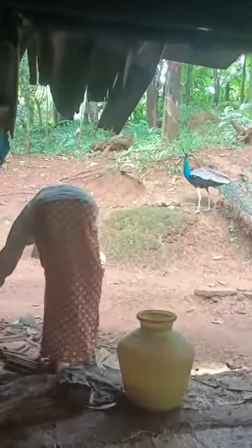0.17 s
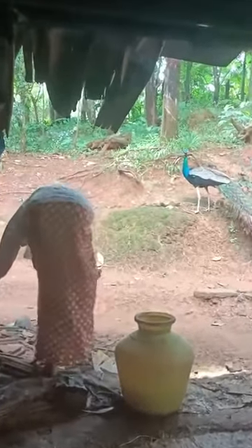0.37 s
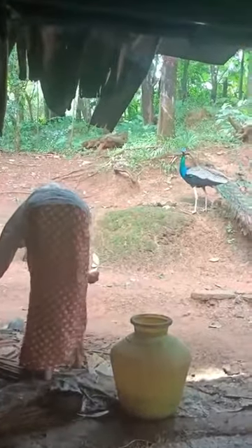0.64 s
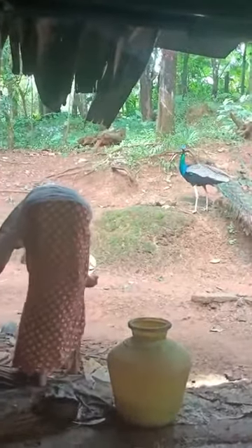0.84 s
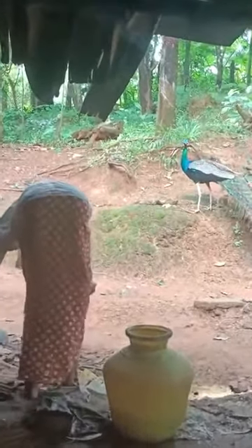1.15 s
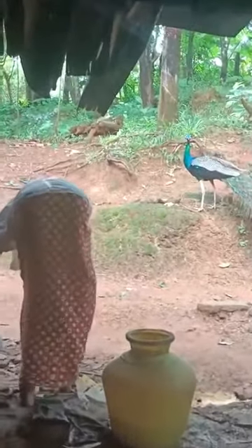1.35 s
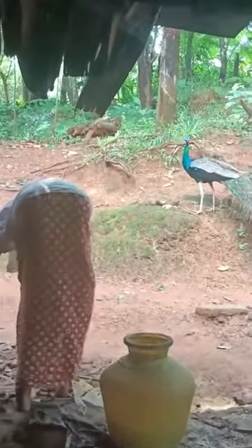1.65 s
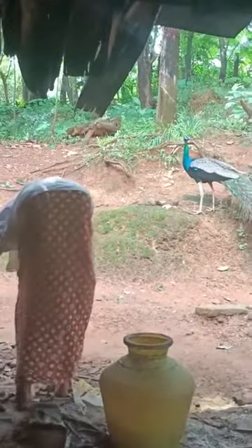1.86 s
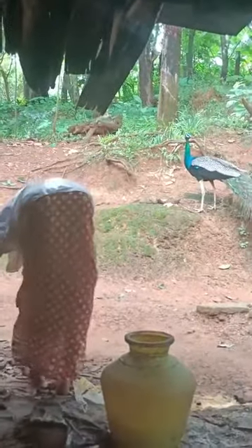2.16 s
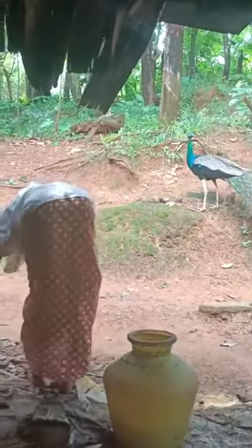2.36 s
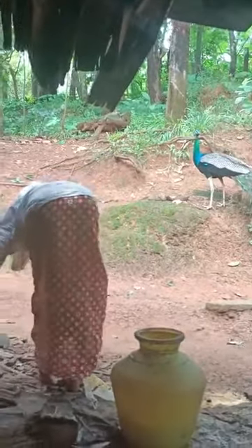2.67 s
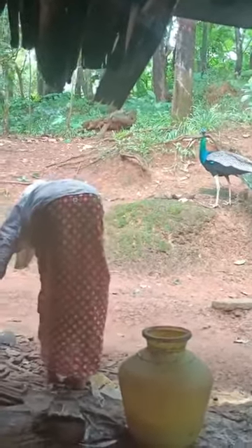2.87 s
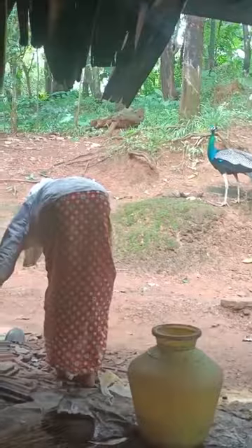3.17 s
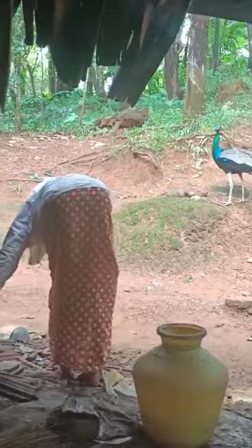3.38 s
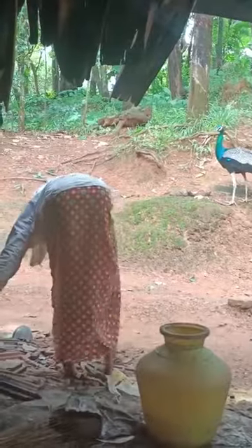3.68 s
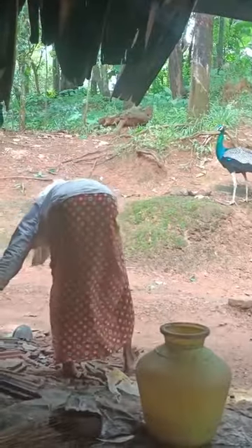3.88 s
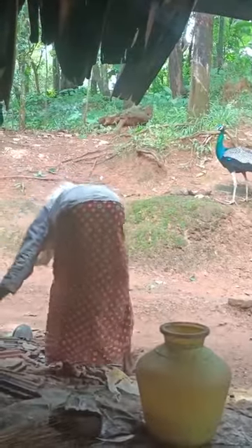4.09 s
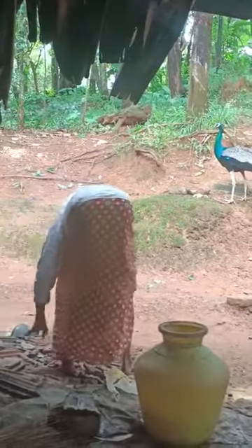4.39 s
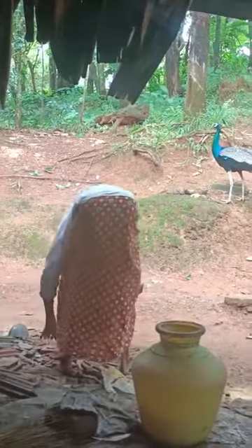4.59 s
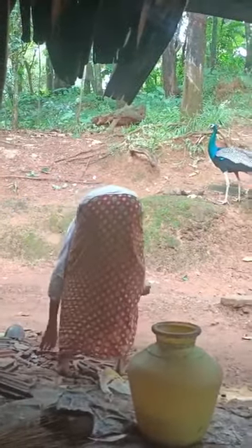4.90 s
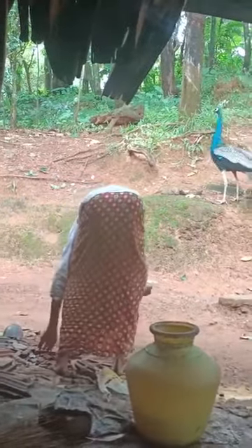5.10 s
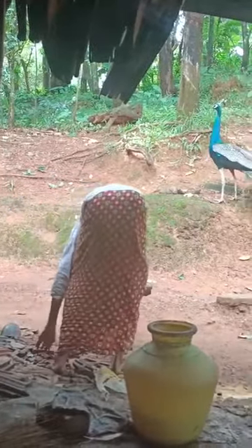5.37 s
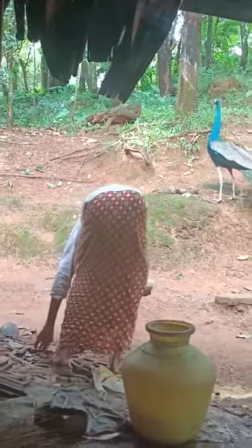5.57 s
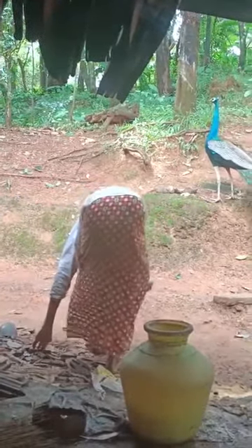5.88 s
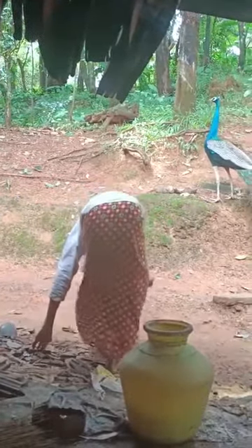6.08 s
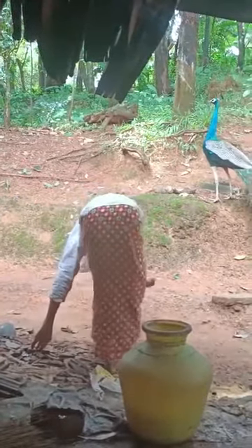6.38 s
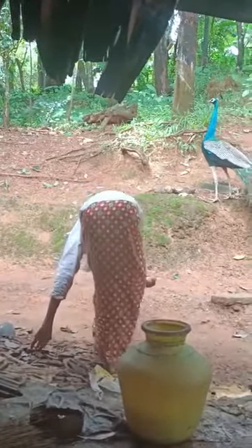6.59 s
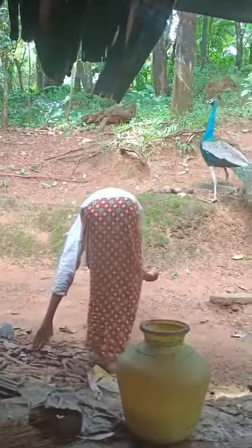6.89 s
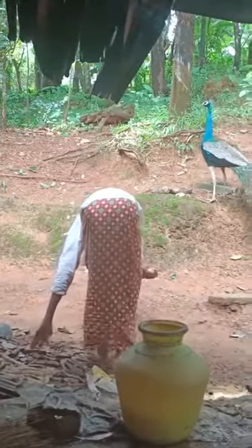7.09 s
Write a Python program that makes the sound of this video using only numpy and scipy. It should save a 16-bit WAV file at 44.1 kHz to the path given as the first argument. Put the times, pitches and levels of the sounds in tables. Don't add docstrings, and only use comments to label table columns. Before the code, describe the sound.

In a lean-to beside a wooded yard, a near chick repeats loud, pure whistled peeps that slip and break downward. Softer chicks slide and wander around it, and a hen clucks low and breathily farther off. Dry leaves rustle midway, snapping sharply at five seconds, then the calls continue. Steady airy hiss throughout; phone-like stereo pickup with short wall echoes.

```python
import sys
import numpy as np
from scipy import signal
from scipy.fft import rfft, irfft
from scipy.io import wavfile
from scipy.ndimage import uniform_filter1d

SR = 44100
rng = np.random.default_rng(int(sys.argv[2]) if len(sys.argv) > 2 else 0)


def generate_wav(sig):
    pcm = np.round(np.clip(np.atleast_2d(sig).T, -1, 1) * 32767).astype(np.int16)
    wavfile.write(sys.argv[1], SR, pcm)


def gain_from_db(level_db):
    decades = np.asarray(level_db, float) / 20
    return 10 ** decades


N = 319725


def evened(x):
    return x / np.sqrt(np.mean(x ** 2) + 1e-20)


def read(points, hz):
    f, value = np.transpose(points)
    return np.interp(np.log(hz + 1), np.log(f + 1), value)


def wander(length, size):
    noise = rng.standard_normal(SR // 4)
    return evened(signal.oaconvolve(noise, np.hanning(2 * size), "same"))[:length]


def unfold(rows):
    s, *columns = np.transpose(rows)
    t = np.arange(s[0], s[-1], 1 / SR)
    return [uniform_filter1d(np.interp(t, s, c), size=221, mode="nearest") for c in columns]


def add(mix, s, sound):
    at = round(s * SR)
    part = mix[..., max(at, 0):][..., :sound.shape[-1] + min(at, 0)]
    part += sound[..., max(-at, 0):][..., :part.shape[-1]]


def resonate(x, hz, width):
    turn = np.exp(2j * np.pi * np.cumsum(hz * np.ones(len(x))) / SR)
    r = np.exp(-np.pi * width / SR)
    smooth = signal.lfilter([1 - r], [1, -r], x / turn + 1e-18)
    return 2 * (turn * smooth).real


# (frequency [Hz], t60 [s])
WALL_RING = [(500, 0.28), (3000, 0.32), (8000, 0.25), (14000, 0.15)]


def walls(x):
    length, gap_s, spacing = SR // 2, .003, 20
    start = np.arange(round(gap_s * SR), length - spacing, spacing)
    places = start + rng.integers(0, spacing, (2, len(start)))
    taps = np.zeros((2, length))
    np.put_along_axis(taps, places, rng.choice([-1., 1.], (2, len(start))), 1)
    hz, t, z = signal.stft(taps, SR, nperseg=256)
    long_tail = gain_from_db(-60 * t / read(WALL_RING, hz)[:, None])
    burst = gain_from_db(9.5 - 60 * t / .11)
    echoes = signal.istft(z * (long_tail + burst), SR, nperseg=256)[1]
    return signal.fftconvolve(x, echoes / np.linalg.norm(echoes[0]), axes=1)[:, :N]


AIR_DB = -45.5
# (frequency [Hz], level [dB per Hz])
AIR_COLOUR = [(12, -33), (20, -5.5), (96, -2), (326, -5.5), (456, -5.5), (571, -7.5), (656, -10),
              (997, -12.5), (1180, -11), (1650, -15), (2000, -9), (5480, -8.5), (9850, -20.5), (13000, -19),
              (15800, -31)]
# (frequency [Hz], side over mid [dB])
AIR_WIDTH = [(60, -54), (110, -18.5), (200, -16), (380, -6.5), (700, -4.5), (1290, 1), (2380, 0.5),
             (4400, 0), (8120, 0), (15000, -1)]
# (frequency [Hz], left over right [dB])
AIR_LEAN = [(60, 1), (110, -1), (200, 1.5), (380, -1.5), (700, -1), (1290, 3.0), (2380, 2.5), (4400, 2.5),
            (8120, -2.5), (15000, 6)]


def air():
    frames, hz = N // 256 + 5, np.fft.rfftfreq(1024, 1 / SR)
    a, b, c, d, patches = rng.standard_normal((frames, len(hz), 5)).T
    patches = uniform_filter1d(patches, size=12, axis=0)
    patches = evened(uniform_filter1d(patches, size=14, axis=1))
    patches_db = 1.26 * patches * np.minimum(hz / 1500, 1)[:, None]
    level = gain_from_db(read(AIR_COLOUR, hz)[:, None] + patches_db)
    mid = level * (a + 1j * b)
    side = level * (c + 1j * d) * gain_from_db(read(AIR_WIDTH, hz))[:, None]
    scale = gain_from_db(AIR_DB) / np.std(signal.istft(mid, nperseg=1024, noverlap=768)[1])
    lean = gain_from_db(read(AIR_LEAN, hz) / 2)[:, None]
    sides = np.array([(mid + side) * lean, (mid - side) / lean])
    return scale * signal.istft(sides, nperseg=1024, noverlap=768)[1][:, :N]


# (time of the peak [s], level [dB], rise [s], t60 [s], tilt [dB per octave])
RUSTLES = [
    (3.231, -44, 0.035, 0.53, 13),
    (3.621, -33.5, 0.097, 0.22, 10.5),
    (3.887, -32, 0.0012, 0.12, 4.5),
    (5, -25, 0.00063, 0.055, 4),
    (5.008, -22, 0.017, 0.087, 12),
]
# (frequency [Hz], level [dB per Hz])
LITTER_COLOUR = [(710, -57), (1200, -12), (1950, 1), (3140, 6), (7760, -13), (8460, -18.5), (11600, -17),
                 (14100, -22), (15800, -36)]


def litter():
    dry, t = np.zeros((2, N)), np.arange(-SR // 8, SR // 4) / SR
    hz = np.fft.rfftfreq(len(t), 1 / SR)
    for s, db, rise, t60, tilt_db in RUSTLES:
        grains = rng.standard_normal((2, len(t))) * gain_from_db(2.0 * rng.exponential(1, len(t)))
        colour = gain_from_db(read(LITTER_COLOUR, hz) + tilt_db * np.log2((hz + 100) / 5000))
        crackle = evened(irfft(rfft(grains) * colour, len(t)))
        push = np.where(t < 0, np.exp(-(2 * t / rise) ** 2), gain_from_db(-60 * t / t60))
        add(dry, s + t[0], gain_from_db(db) * push * crackle)
    return dry + gain_from_db(-4) * walls(dry)


def cluck_shape(start, length, db, mouth_hz, hz):
    share = np.array([0, .36, 1])
    effort_db = db + np.array([-3.5, 0, -13.5])
    pitch_hz = hz * (1 + .062 * (1 - 2 * share))
    return np.transpose([start + length * share, effort_db, np.full(3, mouth_hz), pitch_hz])


# (frequency [Hz], width [Hz], level [dB])
THROAT = [(384, 310, -6.5), (1096, 1050, -13.5)]


def cluck(rows, rough):
    effort_db, mouth_hz, hz = unfold(rows)
    wobble = 0.071 * rough * wander(len(hz), size=150)
    turns = np.cumsum(hz * (1 + wobble)) / SR
    folds = sum(np.cos(2 * np.pi * k * turns) for k in range(1, 9))
    gate = .3 + np.exp(-(turns % 1) / .35)
    puffs = gate * resonate(rng.standard_normal(SR // 4)[:len(hz)], 1170, 3100)
    drive = (1 - rough) * evened(folds) + rough * evened(puffs)
    voice = resonate(resonate(drive, mouth_hz, 280), mouth_hz, 280)
    for f, width, db in THROAT:
        voice = voice - gain_from_db(db) * resonate(resonate(drive, f, width), f, width)
    return gain_from_db(effort_db) * evened(voice) * signal.windows.tukey(len(hz), .3)


# (start [s], length [s], effort [dB], mouth resonance [Hz], pitch [Hz])
HOARSE_CLUCKS = [(.19, 0.07, -41, 804, 404.6), (1.165, 0.071, -42, 790, 381),
                 (1.62, 0.077, -43, 800, 304.4), (1.95, 0.051, -46, 710, 454),
                 (2.06, 0.087, -42.5, 700, 376.5), (3.01, 0.078, -43.5, 785, 281),
                 (3.145, 0.049, -44.5, 580, 340), (3.74, 0.086, -43, 605, 460),
                 (4.43, 0.127, -45, 580, 274), (4.6, 0.072, -49, 618, 321), (6.53, 0.053, -49.5, 940, 261),
                 (6.645, 0.086, -40.5, 1050, 298)]
# (start [s], length [s], effort [dB], mouth resonance [Hz], pitch [Hz])
CLEAR_CLUCKS = [
    (3.47, 0.078, -43.5, 770, 464),
    (4.01, 0.074, -41, 523, 268),
    (5.04, 0.1, -43.5, 910, 255.2),
    (5.555, 0.08, -40, 790, 252),
    (5.945, 0.1, -42, 776, 255),
]


def hen():
    dry = np.zeros(N)
    for clucks, rough in ((HOARSE_CLUCKS, .75), (CLEAR_CLUCKS, .45)):
        for row in clucks:
            add(dry, row[0], cluck(cluck_shape(*row), rough))
    return gain_from_db([[-2.5], [-3]]) * dry + gain_from_db(2.5) * walls(dry[None])


# (frequency [Hz], level [dB])
OVERTONES = [(5400, -23.5), (6000, -18), (6600, -34.5), (7300, -15), (8000, -20.5), (8800, -30),
             (9500, -24.5), (10200, -18), (11200, -17), (12500, -29), (13500, -29), (15000, -24)]
ORDER_DB = {2: 1, 3: -12.5, 4: -13.5}


def peep(rows, press_db, lag):
    hz, level_db, pan_db = unfold(rows)
    tremble = 1 + 0.004 * wander(len(hz), size=150)
    turns = np.cumsum(hz * tremble) / SR - np.outer([0, lag], hz)
    overtones = 0
    for k, db in ORDER_DB.items():
        strength = gain_from_db(db + read(OVERTONES, k * hz)) * (k * hz < SR / 2)
        overtones = overtones + strength * np.sin(2 * np.pi * k * turns)
    hoarse = 1 + .7 * wander(len(hz), size=50)
    purer_db = -.02 * np.maximum(hz - 4500, 0)
    whistle = np.sin(2 * np.pi * turns) + gain_from_db(press_db + purer_db) * hoarse * overtones
    flutter_db = 3 * wander(len(hz), size=120)
    loudness = np.sqrt(2) * gain_from_db(level_db + flutter_db) * signal.windows.tukey(len(hz), .1)
    return whistle * loudness * gain_from_db(np.outer([.5, -.5], pan_db))


def chicks(peeps, presses_db, direct_db, walls_db, lag):
    dry = np.zeros((2, N))
    for rows, press_db in zip(peeps, presses_db):
        add(dry, rows[0][0], peep(rows, press_db, lag))
    return gain_from_db(direct_db) * dry + gain_from_db(walls_db) * walls(dry)


def slide_shape(start, length, first_hz, last_hz, db):
    share = np.array([0, .53, 1])
    hz = first_hz + (last_hz - first_hz) * (share + [0, .03, 0])
    return np.transpose([start + length * share, hz, db + np.array([2.5, 0, -13.5])])


# (time [s], pitch [Hz], level [dB])
LONG_PEEPS = [
    [(.21, 2950, -36.5), (.248, 3800, -41), (.274, 3560, -38), (.316, 3630, -31.5), (.382, 3350, -34.5),
     (.41, 3100, -50)],
    [(1.535, 4200, -43), (1.55, 4220, -40), (1.578, 4130, -37.5), (1.612, 3750, -40)],
    [(4.51, 4450, -42), (4.545, 4390, -39), (4.572, 4260, -49), (4.59, 2830, -37), (4.612, 2720, -54)],
    [(5.508, 4350, -32), (5.527, 4650, -44.5), (5.59, 3474, -36.5), (5.63, 3230, -37), (5.66, 2980, -48)],
    [(6.2, 4220, -39), (6.216, 4700, -47), (6.24, 4790, -38.5), (6.272, 3770, -36), (6.33, 3603, -28.5),
     (6.37, 3560, -26), (6.4, 3200, -40)],
    [(6.53, 5810, -39.5), (6.58, 5740, -36.5), (6.604, 5170, -37), (6.632, 4530, -46), (6.644, 3620, -29),
     (6.69, 2830, -54)],
    [(7.15, 4310, -52), (7.165, 4640, -39), (7.205, 4810, -38), (7.225, 4350, -36), (7.249, 4470, -39)],
]
# (start [s], length [s], first pitch [Hz], last pitch [Hz], level [dB])
CLEAR_SLIDES = [
    (.785, .068, 4400, 4270, -45),
    (.985, .165, 5350, 4150, -48),
    (2.935, .07, 4560, 4420, -47),
    (.665, .045, 11500, 11050, -50),
]
# (start [s], length [s], first pitch [Hz], last pitch [Hz], level [dB])
PRESSED_SLIDES = [
    (.83, .12, 3500, 2780, -34),
    (1.62, .1, 3160, 2790, -31),
    (4.23, .11, 3520, 2850, -42),
]


def brood():
    voices = [(np.array(rows), 1.5) for rows in LONG_PEEPS]
    voices += [(slide_shape(*row), -25) for row in CLEAR_SLIDES]
    voices += [(slide_shape(*row), 9.5) for row in PRESSED_SLIDES]
    pan_db = 2.5
    placed = [np.column_stack([rows, np.full(len(rows), pan_db)]) for rows, _ in voices]
    return chicks(placed, [press_db for _, press_db in voices], direct_db=-8.0, walls_db=0.14, lag=.00008)


def near_shape(slip, shelf, high_hz, low_hz, db, break_s, held_db):
    hook_s, top_s, slip_s, fade_s, end_s = .013, .03, .019, .018, .017
    shelf_db, break_db = -5, -2
    top_hz = 5116 + 28 * (db + held_db + 17)
    middle_hz = (high_hz + low_hz) / 2 - 71.3
    steps = [0, hook_s, top_s, slip_s, shelf / 2, shelf / 2, break_s, fade_s, end_s]
    s = slip - top_s - hook_s + np.cumsum(steps)
    hz = [3700, top_hz, top_hz - 118.4, high_hz, middle_hz, low_hz, 2991, 2780, 2744]
    before_db = held_db + np.array([-10, -22, -9.5, shelf_db, (shelf_db + break_db) / 2, break_db])
    level_db = db + np.r_[before_db, 0, -9, -19]
    pan_db = 1.2 + 3 * (s <= slip + 1e-6) + 1.8 * rng.standard_normal(len(s))
    return np.transpose([s, hz, level_db, pan_db])


# (slip from the top note [s], shelf length [s], shelf start [Hz], shelf end [Hz], level [dB])
EVEN_PEEPS = [
    (-.004, 0.066, 4410, 3655, -30),
    (2.122, 0.092, 4130, 3440, -27.5),
    (3.354, 0.1, 4150, 3452, -19.5),
    (4.739, 0.096, 4220, 3484, -18.5),
    (5.292, .098, 4110, 3305, -20.5),
]
# (slip from the top note [s], shelf length [s], shelf start [Hz], shelf end [Hz], level [dB])
SURGING_PEEPS = [
    (.44, 0.076, 4214, 3635, -14.5),
    (2.67, 0.073, 4230, 3700, -15.5),
    (4.054, .105, 4285, 3410, -16),
    (6.321, .072, 4296, 3605, -14.5),
    (6.884, 0.086, 4260, 3737, -15.5),
]


def near_chick():
    peeps = [near_shape(*row, break_s=.014, held_db=1.3) for row in EVEN_PEEPS]
    peeps += [near_shape(*row, break_s=.024, held_db=-5) for row in SURGING_PEEPS]
    return chicks(peeps, np.zeros(len(peeps)), direct_db=-2.3, walls_db=-1.1, lag=.00009)


def scene():
    return air() + litter() + hen() + brood() + near_chick()


# (frequency [Hz], reach [dB])
KEPT_REACH = [(900, 60), (1250, 40), (2000, 44), (2400, 60), (7900, 56), (8300, 35), (9900, 37),
              (10300, 52), (11500, 52), (11900, 42), (13900, 44), (14300, 52)]


def drop_weak_bands(x):
    hz, _, z = signal.stft(x, SR, nperseg=2048, noverlap=1536)
    bands = z[:, :1024].reshape(2, 64, 16, -1)
    power_db = 10 * np.log10((abs(bands) ** 2).sum(axis=2) + 1e-20)
    above = np.subtract.outer(np.arange(64), np.arange(64))
    spread_db = 18 + np.maximum(3.2 * above, -12 * above)
    neighbours_db = (power_db[:, None] - spread_db[None, :, :, None]).max(axis=2)
    loudest_db = power_db.max(axis=1, keepdims=True) - read(KEPT_REACH, hz[8:1024:16])[:, None]
    heard = power_db > np.maximum(neighbours_db, loudest_db)
    heard_bands = (bands * heard[:, :, None]).reshape(2, 1024, -1)
    kept = np.concatenate([heard_bands, z[:, 1024:]], axis=1)
    luck = evened(uniform_filter1d(rng.standard_normal((171, z.shape[2])), size=9))
    luck = luck.repeat(6, axis=0)[:len(hz)]
    plain = abs(z) < gain_from_db(read(AIR_COLOUR, hz) + AIR_DB - 4)[:, None]
    kept *= ~((luck > 1.35) & plain & (hz > 900)[:, None])
    return signal.istft(kept, nperseg=2048, noverlap=1536)[1][:, :N]


def roll_off(x):
    return signal.sosfilt(signal.butter(12, 15700, fs=SR, output="sos"), x)


def record(dry):
    mix = drop_weak_bands(dry)
    return roll_off(mix)


dry = scene()
out = record(dry)
generate_wav(out)
```